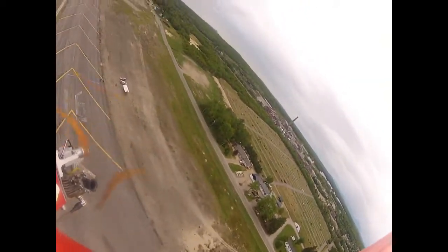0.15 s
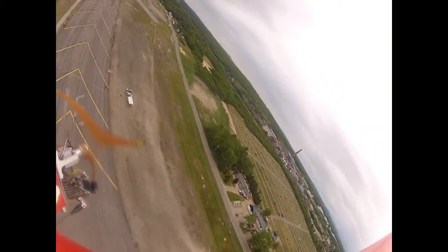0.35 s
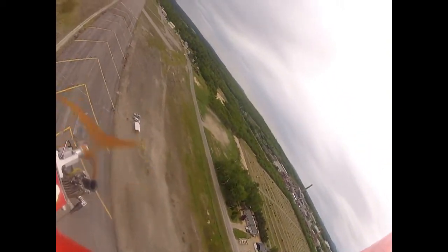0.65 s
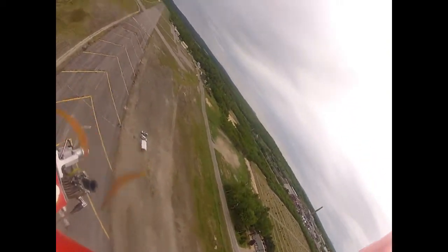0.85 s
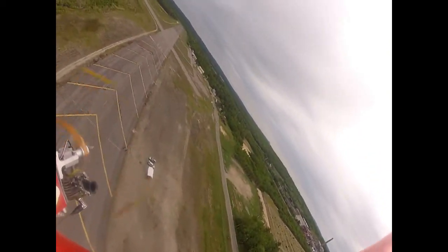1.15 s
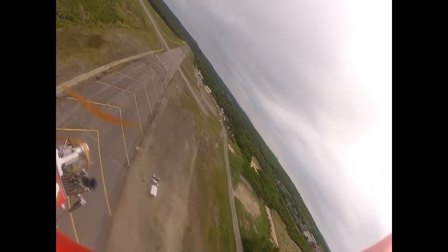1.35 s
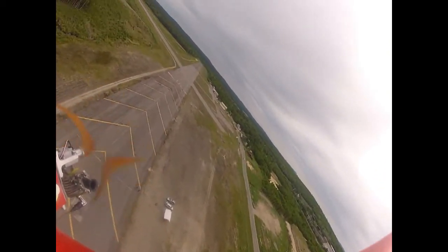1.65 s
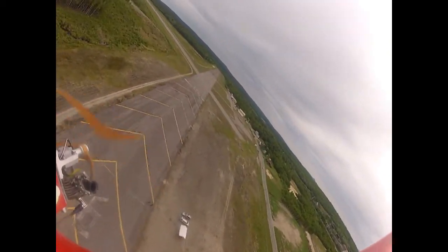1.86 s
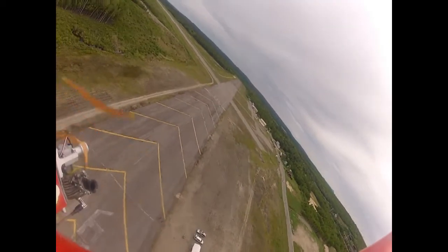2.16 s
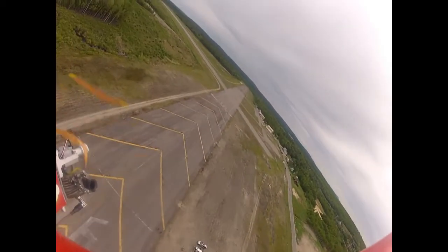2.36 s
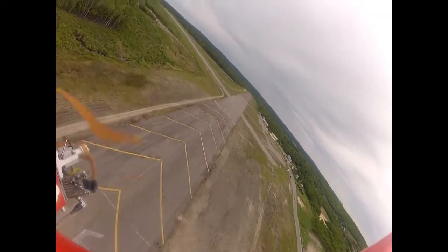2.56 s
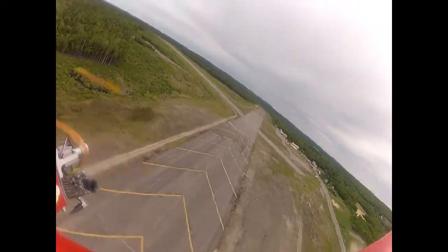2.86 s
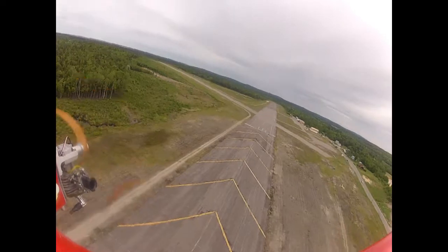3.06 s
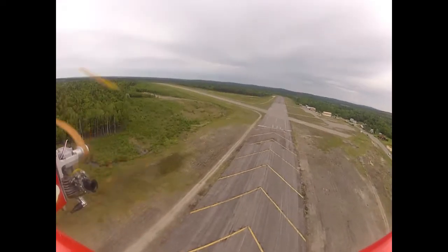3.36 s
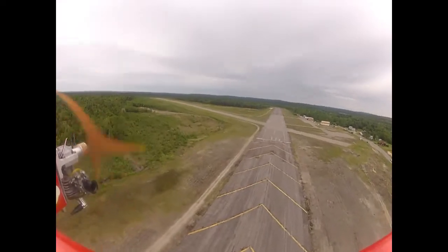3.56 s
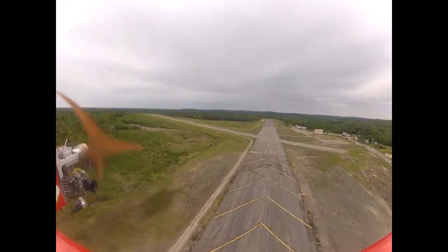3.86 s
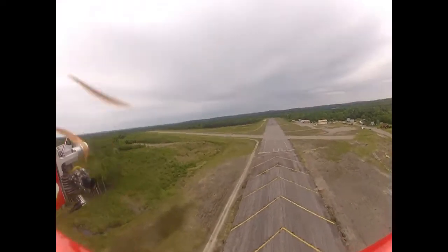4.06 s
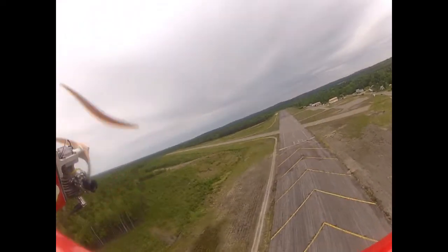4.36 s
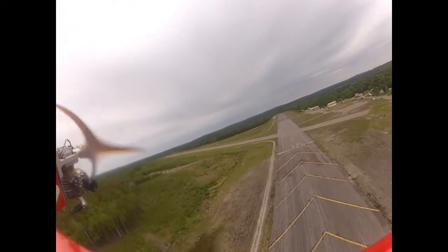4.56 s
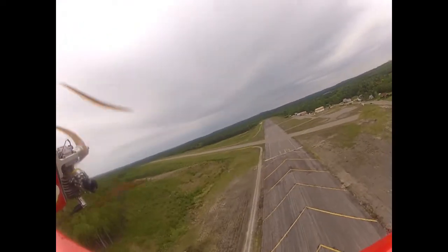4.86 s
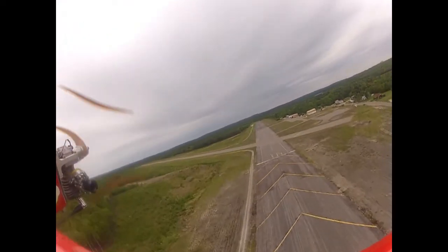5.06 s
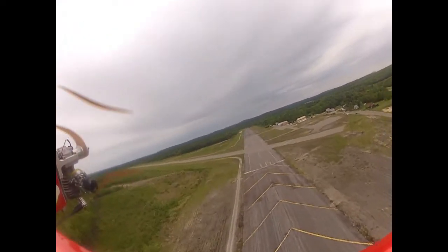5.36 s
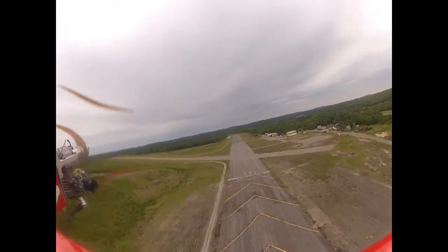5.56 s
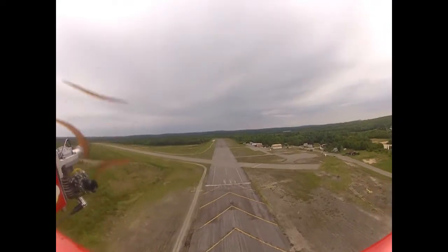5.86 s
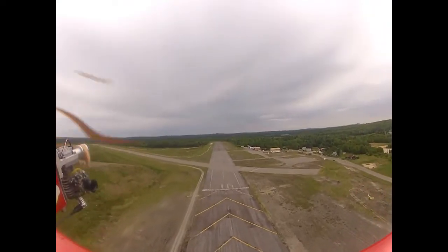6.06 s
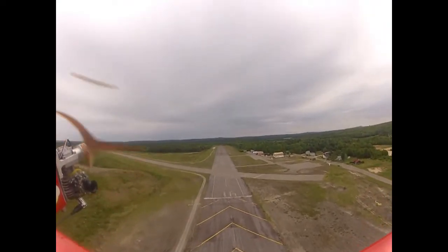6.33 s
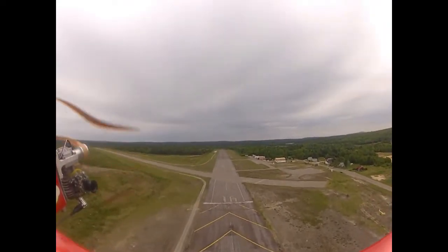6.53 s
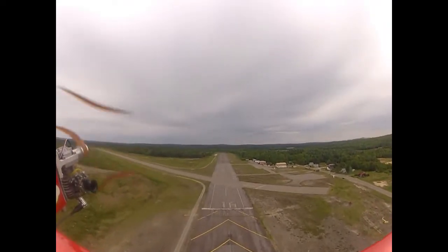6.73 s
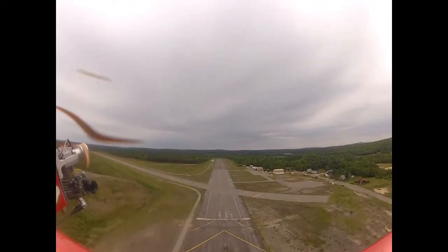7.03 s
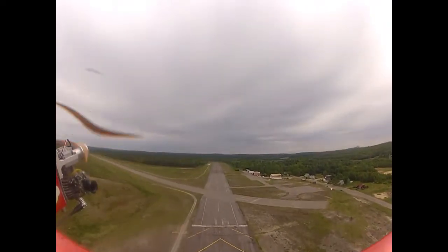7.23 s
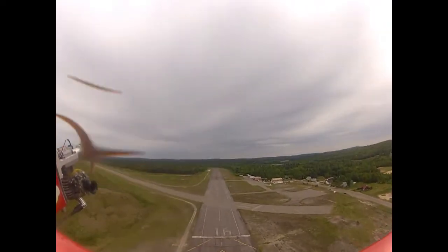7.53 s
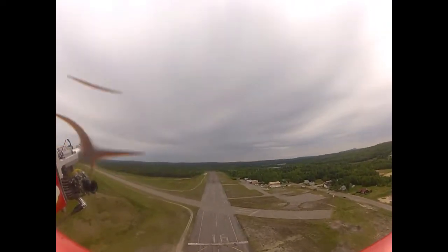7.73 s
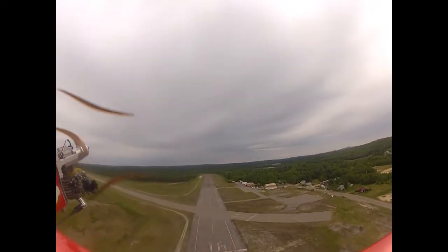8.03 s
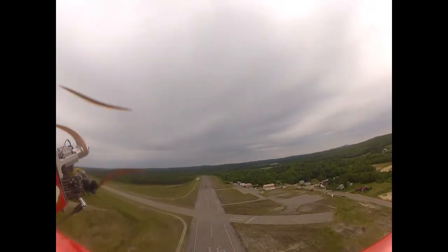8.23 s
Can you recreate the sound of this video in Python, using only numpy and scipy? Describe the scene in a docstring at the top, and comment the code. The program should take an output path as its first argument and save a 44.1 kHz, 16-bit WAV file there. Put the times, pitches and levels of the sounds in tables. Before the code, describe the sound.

From 0 to about 4.5 seconds, a small two-stroke engine idles right beside a microphone sealed in a case on a model plane's wing. It beats as a rapid, rough flutter of low thuds, roughly twenty-seven a second, with occasional early or late stumbles. Each knock jolts the case and rings the airframe hollowly, stirring boxy rattle and low buffeting; the rattle slowly dulls. Small pings or clicks poke through near 1.9, 3.3 and 3.5 seconds. Around 4.55 the throttle opens: the flutter fuses into a rough, laboring growl, with a click near 4.9, and pitch climbs quickly, slowing by 5.5. From then to 8.4 seconds it holds a loud, steady buzzing drone, strongest near 390 hertz, with a raspy exhaust edge that swells and fades slightly over filtered slipstream hiss. The sound is close, dry, gritty and overloaded, stopping mid-drone.

```python
"""A small two-stroke engine, heard close by from a camera's microphone sealed in its case on a model plane's wing.
At idle it fires only every third turn, now and then after two or four, and each firing jolts the case.
Then the throttle opens and it fires every turn: a steady drone of shaft orders with a filtered exhaust bark.
Around it shaped noise makes rattle and buffeting at idle and slipstream hiss at open throttle;
there are a few short pings and clicks."""
import sys
import numpy as np
from scipy import signal
from scipy.fft import rfft, irfft
from scipy.io import wavfile
from scipy.ndimage import uniform_filter1d

SR = 44100
rng = np.random.default_rng(int(sys.argv[2]) if len(sys.argv) > 2 else 0)


def dump(signal):
    """Clip the signal to [-1, 1] and save it as 16-bit WAV at the path in sys.argv[1]."""
    limited = np.clip(np.atleast_2d(signal).T, -1, 1)
    pcm = np.round(limited * 32767).astype(np.int16)
    wavfile.write(sys.argv[1], SR, pcm)


def volts_from_db(level):
    """Convert decibel levels to linear amplitude ratios."""
    exponent = np.asarray(level, float) / 20
    return 10 ** exponent


N = 369999

# shaft speed at idle: (time [s], speed [turns per s])
IDLE_SPEED = [(0, 81.49), (0.3, 79.53), (0.75, 81.06), (1.1, 80.05), (1.85, 82.32), (2.5, 78.88),
              (2.75, 80.14), (3, 77.17), (3.25, 78.71), (3.5, 78.02), (3.75, 78.74), (4.1, 77.6),
              (4.45, 78.5), (4.62, 80.74)]
# open throttle: (time [s], speed [turns per s], rms level of shaft orders 1, 2 and 3 [dB each])
OPEN_THROTTLE = [(4.55, 79.6, -19, -27, -20), (4.6, 84.67, -17, -16, -17), (4.63, 90.25, -24, -24, -24),
                 (4.66, 95.2, -24, -27, -12.5), (4.71, 103.2, -28, -25, -19.5),
                 (4.78, 109.3, -24, -41, -11.5), (4.85, 111.5, -25, -26, -13.5),
                 (4.96, 112.9, -25, -19, -17.5), (5.09, 114, -26, -20.5, -17.5),
                 (5.14, 115.7, -30, -23, -14.5), (5.19, 121.4, -33, -31, -16.5),
                 (5.33, 124.4, -31, -27, -15), (5.4, 127.2, -43, -35, -16.5),
                 (5.53, 129.1, -37, -26, -16.5), (5.84, 130.3, -35, -29, -15.5),
                 (6.24, 129.8, -33.5, -27, -15), (6.65, 129.8, -34.5, -27.5, -15.5),
                 (7.06, 130.1, -31.5, -28.5, -15.5), (8.39, 129.4, -33.5, -28.5, -15)]


def evened(x):
    """Scales to rms 1."""
    return x / np.sqrt(np.mean(x ** 2) + 1e-20)


def gain_at(points, hz):
    """Gain of a spectrum whose points in dB are joined on a log-frequency axis."""
    f, db = np.transpose(points)
    return volts_from_db(np.interp(np.log(hz + 1), np.log(f + 1), db))


def columns(rows, t):
    """The columns of a curve table at times t."""
    s, *rest = np.transpose(rows)
    return [np.interp(t, s, c) for c in rest]


def ramp(t, start_s, end_s, first, last):
    """A straight line between two times, held outside them."""
    return np.interp(t, [start_s, end_s], [first, last])


def causal(points):
    """Minimum-phase impulse response of a spectrum, with a floor at -70 dB."""
    hz = abs(np.fft.fftfreq(8192, 1 / SR))
    log_gain = np.log(np.maximum(gain_at(points, hz), volts_from_db(-70)))
    return np.fft.ifft(np.exp(np.conj(signal.hilbert(log_gain)))).real[:4096]


def lifted(x, lift_db, corner_hz):
    """Raises or lowers the treble by adding a share of its high-passed part."""
    treble = signal.sosfilt(signal.butter(1, corner_hz, "high", fs=SR, output="sos"), x)
    return x + (volts_from_db(lift_db) - 1) * treble


def drift(rate_hz):
    """Slow chance: random steps of rms 1 joined by straight lines."""
    steps = rng.standard_normal(int(N / SR * rate_hz) + 2)
    return np.interp(np.arange(N) / SR * rate_hz, np.arange(len(steps)), steps)


def noise(gain, patchy_db, flicker_db):
    """Random short-time spectra with drifting patches and a flicker shared by all bands, shaped by gain(Hz)."""
    frames = N // 128 + 5
    a, b, patches = rng.standard_normal((frames, 257, 3)).T
    patches = evened(uniform_filter1d(uniform_filter1d(patches, 5, 0), 20, 1))
    flicker = evened(uniform_filter1d(rng.standard_normal(frames), 3))
    spectra = (a + 1j * b) * volts_from_db(patchy_db * patches + flicker_db * flicker)
    white = signal.istft(spectra, nperseg=512, noverlap=384)[1][:N]
    return evened(irfft(rfft(white) * gain(np.fft.rfftfreq(N, 1 / SR)), N))


def add(mix, sound):
    """Mixes a sound in from the start."""
    mix[:len(sound)] += sound


def impulses(s, size=None):
    """One impulse at each time s, of the given size."""
    return np.bincount(np.maximum(np.round(s * SR), 0).astype(int), size, N)


def air():
    """Rattle and low buffeting stirred up by each idle firing; slipstream hiss once the throttle opens."""
    # rattle inside the case at idle: (frequency [Hz], relative level [dB])
    idle_hiss = [(260, -6), (440, -0.5), (637, -7.5), (711, -0.5), (775, -15.5), (964, -1.5), (1410, -11),
                 (1590, -14.5), (1780, -10), (2460, -7.5), (2990, -22.5), (3640, -19), (4110, -29.5),
                 (5050, -27.5), (5950, -34.5), (7740, -75), (13100, -120)]
    # resonances of the case that the rattle rings: (frequency [Hz], width [Hz], relative level [dB])
    case_modes = [(716, 130, -9.5), (955, 53, 2), (1802, 160, -3), (3620, 300, -15)]
    # low buffeting at idle: (frequency [Hz], relative level [dB])
    buffet_spectrum = [(20, -36), (50, -3), (100, -17), (200, 4), (380, 13), (480, -55), (600, -29)]
    # slipstream at open throttle: (frequency [Hz], relative level [dB])
    run_hiss = [(20, -1), (100, -2.5), (220, 2.5), (300, 6.5), (420, 4.5), (600, 1), (830, -3), (1000, 5.5),
                (1400, -4.5), (1600, -1.5), (1830, 1.5), (2500, -4), (3050, -7.5), (3600, -3), (4000, -15),
                (5200, -14.5), (6000, -14), (7000, -63)]
    # slipstream over time: (time [s], hiss level before the lift [dB], treble lift [dB])
    slipstream = [(4.69, -25.5, -14), (4.78, -24.5, -16), (4.91, -27.5, -1), (5.0, -33.5, 4.5),
                  (5.15, -29.5, -3), (5.26, -32, 4), (5.33, -30, 0.5), (5.5, -32.5, 2), (6.0, -31, 2),
                  (7.5, -29, -1), (8.39, -30.5, 1)]
    t = np.arange(N) / SR
    opens_s = OPEN_THROTTLE[0][0]
    throttle = ramp(t, 4.64, 4.76, 0, 1)  # the buffeting gives way to the hiss
    stirred = signal.oaconvolve(impulses(firings()[0]), signal.windows.hann(int(0.036 * SR)))[:N]

    # through the idle glide the rattle dulls as the plane slows
    rattle = noise(lambda hz: gain_at(idle_hiss, hz), patchy_db=0.05, flicker_db=1.14)
    rattle = lifted(rattle, ramp(t, 0, opens_s, 9, -0.5), corner_hz=1950)
    rattle *= volts_from_db(ramp(t, 0, opens_s, -28, -24.5)) * ramp(t, 4.61, 4.81, 1, 0)

    def case_gain(hz):
        return sum(volts_from_db(db) / (1 + (2 * (hz - f) / w) ** 2) for f, w, db in case_modes)

    ringing = noise(case_gain, patchy_db=2.0, flicker_db=1.5)
    rattle += volts_from_db(ramp(t, 0, opens_s, -33.5, -31)) * ringing
    stir_db = ramp(t, 0, 4.5, .6, 3.5) * (stirred - .4)
    rattle *= volts_from_db(stir_db) * ramp(t, 4.9, 5.03, 1, 0)

    buffet = volts_from_db(-32.5) * noise(lambda hz: gain_at(buffet_spectrum, hz), patchy_db=2.0, flicker_db=3.5)
    buffet *= (.5 + stirred) * (1 - throttle)

    hiss_db, lift_db = columns(slipstream, t)
    hiss = noise(lambda hz: gain_at(run_hiss, hz), patchy_db=-1.15, flicker_db=-0.9)
    hiss = volts_from_db(hiss_db) * lifted(hiss, lift_db, corner_hz=2600)
    return rattle + buffet + hiss * throttle


def pings():
    """Short pings and clicks: a decaying ring with a soft start, and a noise tick."""
    # (time [s], ring level [dB], frequency [Hz], tick level [dB])
    pings_and_clicks = [(1.906, -14, 1810, -40), (3.288, -24, 950, -21), (3.445, -16, 2200, -33),
                        (3.477, -18, 990, -36), (4.9, -21, 1840, -21)]
    out, t = np.zeros(N), np.arange(1500) / SR
    for s, ring_db, hz, tick_db in pings_and_clicks:
        ring = volts_from_db(ring_db - 60 * t / 0.07) * np.sin(2 * np.pi * hz * t) * (1 - np.exp(-t / 0.0011))
        tick = volts_from_db(tick_db) * rng.standard_normal(len(t)) * np.exp(-t / 0.0016)
        add(out[round(s * SR):], ring + tick)
    return out


def firings():
    """Times of the idle firings, every third turn unless it stumbles, and the turns since the one before."""
    # leaving the three-turn beat: (time of the last even firing [s], turns to the next [turns], repeats [count])
    stumbles = [(0.0, 2, 5), (0.723, 2, 2), (0.958, 2, 3), (1.81, 2, 2), (2.985, 2, 1), (3.279, 4, 1),
                (3.904, 4, 1), (4.532, 2, 3)]
    t = np.arange(round(IDLE_SPEED[-1][0] * SR)) / SR
    turns = np.cumsum(columns(IDLE_SPEED, t)[0]) / SR
    turn_s = np.interp(np.arange(int(turns[-1])), turns, t)
    turn, gaps, fired = 0, [3], []
    while turn < len(turn_s):
        now = turn_s[turn]
        fired.append((now, gaps.pop()))
        stumble = [[gap] * times for s, gap, times in stumbles if abs(s - now) < .006]
        if stumble:
            gaps += stumble[0]
        elif not gaps:
            gaps = [3]
        turn += gaps[-1]
    s, since = np.transpose(fired)
    return s - .0077, since  # the firing leads the counted turn


def idle():
    """Each firing throws the case against its stops and rings the airframe; no two are quite alike."""
    # the case swings between its stops after a firing:
    # (delay [ms], level relative to the firing [dB], direction [sign], contact time [ms])
    jolts = [(1.8, 10.5, -1, 6.2), (8.6, -3, 1, 11), (10.3, 10, 1, 3.4), (15, 1, -1, 4.2),
             (19.2, 12.5, -1, 5.7), (22.9, 1, 1, 5), (34.6, 2, 1, 4.8)]
    # airframe modes rung by a firing: (frequency [Hz], level relative to its drive [dB], t60 [s])
    airframe = [(151, -8.5, 0.19), (246.3, 8, 0.1), (281, 5, 0.17), (396, 9.5, 0.17), (712, -10.5, 0.12)]
    # start of each mode's ring after the firing: (delay [ms] of each mode in turn)
    ring_delays = 2.96, 2.0, 3.9, 3.27, 1.6
    # the three middle modes ring more or less as the beat drifts against them:
    # (drive at 80 turns per s [dB], slope [dB per turn per s], wander [dB])
    middle_modes = [(-28.5, 5, 3), (-27.5, -0.5, 2.5), (-27.5, 2, 2)]
    s, since = firings()
    jolt_db = -19.5 - 2 * (since < 3) + 1 * (since > 3)  # an early firing is weaker, a late one stronger
    faster = np.minimum(columns(IDLE_SPEED, s)[0] - 80, 1.3)  # turns per s; no further effect beyond
    at = np.maximum(s * SR, 0).astype(int)
    mode_db = [db + per_turn * faster + wander_db * drift(3.07)[at] for db, per_turn, wander_db in middle_modes]
    ring_db = [jolt_db, *mode_db, jolt_db]  # the lowest and highest mode follow the jolt
    chance = rng.standard_normal((len(s), 2 * len(jolts) + len(airframe))).T
    out, t = np.zeros(N + SR), np.arange(SR // 4) / SR

    for k, (ms, db, way, contact_ms) in enumerate(jolts):
        push = signal.windows.hann(int(contact_ms * SR / 1000))
        delay_s = (ms - contact_ms / 2 + .15 * chance[2 * k]) / 1000  # the delay marks mid-contact
        size = way * volts_from_db(db + jolt_db + chance[2 * k + 1])
        add(out, signal.oaconvolve(impulses(s + delay_s, size), push))

    for k, ((hz, db, t60), ms) in enumerate(zip(airframe, ring_delays)):
        ring = -volts_from_db(db - 60 * t / t60) * np.sin(2 * np.pi * hz * t)
        ring *= 1 - np.exp(-t / 0.00053)  # soft start
        size = volts_from_db(ring_db[k] + 1.1 * chance[-1 - k])
        add(out, signal.oaconvolve(impulses(s + ms / 1000, size), ring))
    return out[:N]


def mount_sway():
    """The wing mount keeps swaying: chance through two equal complex poles, a narrow band of real rms 1."""
    mount_hz, pole_width_hz = 52.2, 10
    pole = np.exp((2j * np.pi * mount_hz - np.pi * pole_width_hz) / SR)
    sway = signal.lfilter([1], np.poly([pole, pole]), rng.standard_normal(N))
    return sway / np.std(sway.real)


def drone():
    """Clean shaft orders, and the exhaust bark coloured by the case wall, all shaken by the swaying mount."""
    # wander of shaft orders 1 to 3: (wander [dB] of each order in turn)
    low_wander = 0.4, 1.3, 0.2
    # shaft orders 4 to 6: (rms level at full speed [dB], slope [dB per turn per s below it], wander [dB])
    upper_orders = [(-41.5, .8, 2.5), (-42.5, .6, 3), (-34.5, -.05, 1.4)]
    # the bark above its spectral dip swells and fades: (time [s], drive level [dB])
    bark_swell = [(4.7, -60), (4.9, -43), (5.05, -52), (5.18, -39), (5.27, -38), (5.35, -37.5),
                  (5.5, -37.5), (6.05, -40.5), (6.14, -45), (6.25, -34.5), (6.45, -38), (6.7, -47),
                  (6.9, -34.5), (7.1, -37), (7.3, -35.5), (8.25, -36), (8.39, -39.5)]
    # the bark through the case wall, below and above the dip: (frequency [Hz], level [dB])
    bark_low = [(600, -40), (800, 3), (900, -9.5), (1040, -1), (1170, -3.5), (1300, -5.5), (1430, -10),
                (1560, -30), (1700, -35)]
    bark_high = [(1200, -41), (1560, -36), (1680, -8), (1950, -0.5), (2090, -6.5), (2320, -12.5),
                 (2600, -11), (3050, -26), (3600, -17), (4000, -23.5), (5500, -44)]
    full_speed, harshest = 130, 17  # turns per s; turns per s below full speed where labour peaks
    t = np.arange(N) / SR
    opens_s = OPEN_THROTTLE[0][0]
    hz, *order_db = columns(OPEN_THROTTLE, t)
    settled = ramp(t, 4.7, 4.88, 0, 1)  # the bark comes in once every turn fires
    labour = np.clip(full_speed - hz, 0, harshest) * (1 + settled) / 2

    def broken_db():
        """The upper orders break up while the engine labours."""
        return .2 * labour * drift(22.0)

    order_db = [db + wander_db * drift(9.8) for db, wander_db in zip(order_db, low_wander)]
    for db, per_turn, wander_db in upper_orders:
        order_db.append(db + per_turn * labour + wander_db * drift(9.0) + broken_db())

    sway = mount_sway()
    jitter = evened(uniform_filter1d(rng.standard_normal(N), 800))
    turns = np.cumsum(hz * (1 + 0.0012 * drift(9.0) + 0.0011 * jitter)) / SR
    turns += 0.0015 * sway.imag

    phase = .44  # cycles; the orders meet in one steep dip a turn
    lines = np.zeros(N)
    for k, db in enumerate(order_db, 1):
        lines += np.sqrt(2) * volts_from_db(db) * np.cos(2 * np.pi * (k * turns + phase))

    # below the dip the bark follows the swell by a share and thins under labour
    high_db, = columns(bark_swell, t)
    low_db = -39 + 0.22 * (high_db - np.median(high_db)) - 0.08 * labour
    low = np.zeros(N)
    for k in range(7, 14):  # each order swells and fades alone
        size = gain_at(bark_low, k * hz) * volts_from_db(2.8 * drift(8.0) + broken_db())
        flip = np.arctan((k * hz - 1100) / 30)  # orders flip over past the wall resonance
        low += size * np.cos(2 * np.pi * (k * turns + phase + 0.27) + flip)
    bark = settled * np.sqrt(2) * volts_from_db(low_db) * low

    late = turns + 0.021  # the sharp part of the bark, a share of a turn from the deepest swing
    turn_size = volts_from_db(0.26 * rng.standard_normal(int(turns[-1]) + 3))
    pulses = sum(volts_from_db(2.0 * drift(5.0)) * np.cos(2 * np.pi * k * late) for k in range(8, 36))
    pulses *= turn_size[np.floor(late + .5).astype(int)]
    sharp = signal.oaconvolve(np.sqrt(2) * volts_from_db(high_db) * pulses, causal(bark_high))[:N]
    rasp_db = .6 * labour  # brighter while the engine labours up to speed
    bark += lifted(lifted(sharp, rasp_db, corner_hz=3600), rasp_db, corner_hz=3620)

    sway_db = ramp(t, opens_s, t[-1], -50, -43.5)
    shaken = (lines + bark) * (1 + 0.01 * sway.real) + volts_from_db(sway_db) * sway.real
    return shaken * np.clip((t - opens_s) / 0.0096, 0, 1)


def scene():
    """Everything reaches the microphone through the case."""
    return (idle() + drone() + air() + pings())[None]


def low_pass(x):
    """Removes everything above the highest recorded frequency."""
    return signal.sosfilt(signal.butter(12, 15560, fs=SR, output="sos"), x)


def record(dry):
    """Bass cut and overload; 12000 samples a second, each held four times, mirror the sound about 12 kHz."""
    cut = signal.sosfilt(signal.butter(2, 6, "high", fs=SR, output="sos"), dry)
    ceiling, knee = .49, 6.5
    clipped = cut / (1 + abs(cut / ceiling) ** knee) ** (1 / knee)
    coarse = signal.resample_poly(clipped, 40, 147, axis=1)
    held = signal.resample_poly(np.repeat(coarse, 4, axis=1), 147, 160, axis=1)[:, :N]
    return low_pass(held)


dry = scene()
out = record(dry)
dump(out)
```